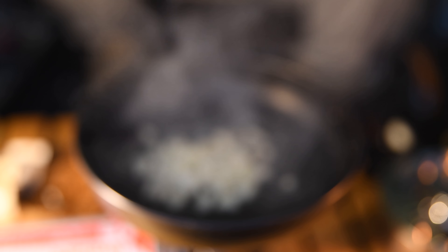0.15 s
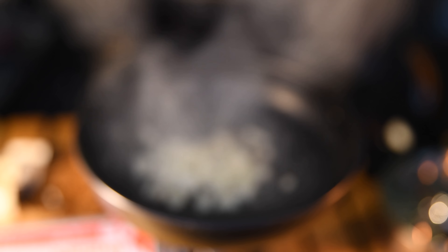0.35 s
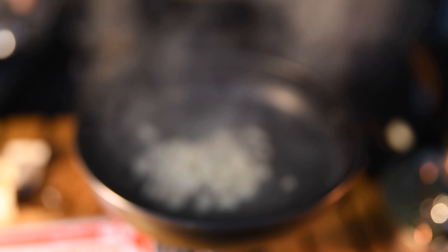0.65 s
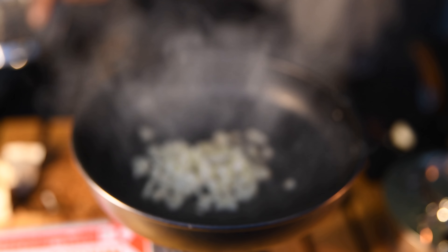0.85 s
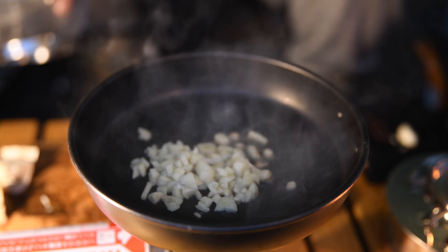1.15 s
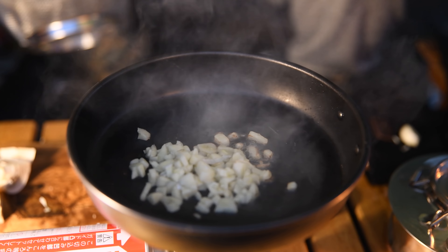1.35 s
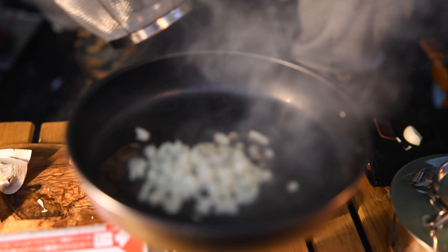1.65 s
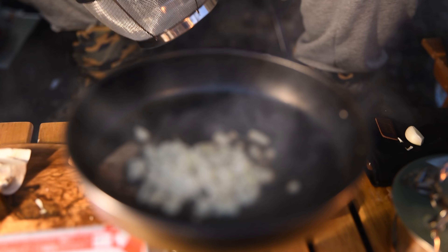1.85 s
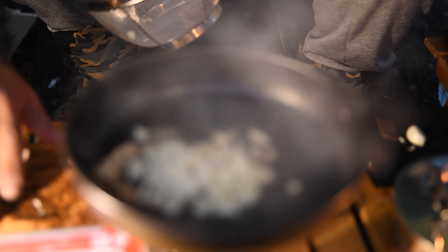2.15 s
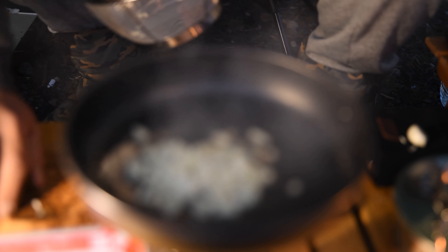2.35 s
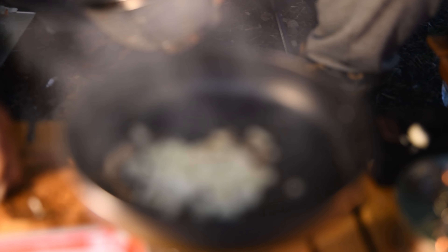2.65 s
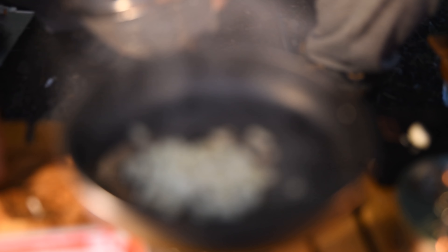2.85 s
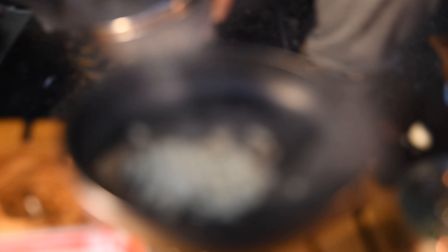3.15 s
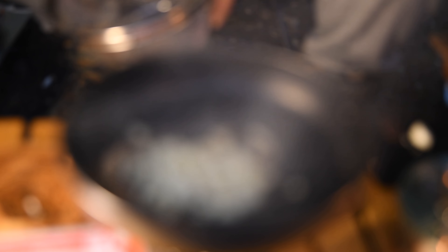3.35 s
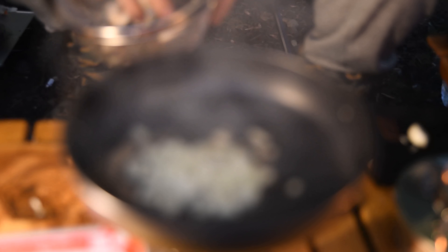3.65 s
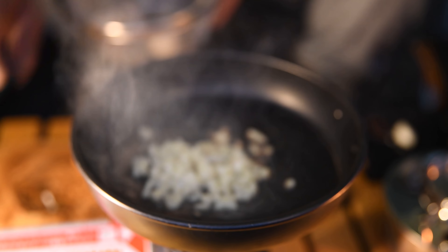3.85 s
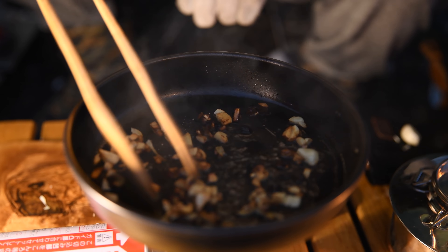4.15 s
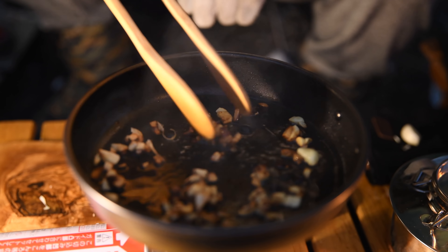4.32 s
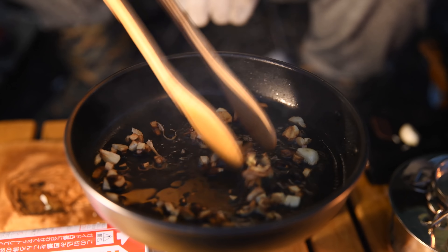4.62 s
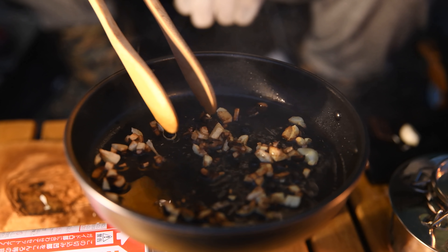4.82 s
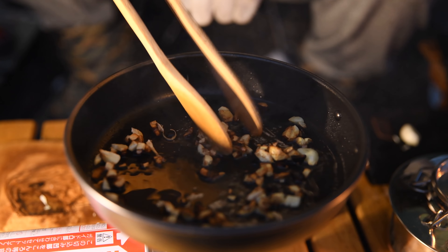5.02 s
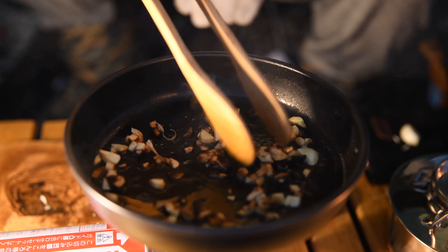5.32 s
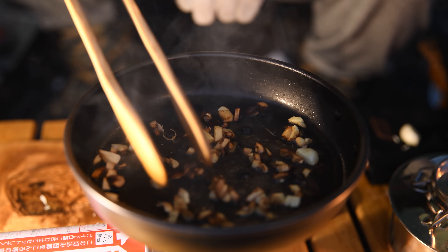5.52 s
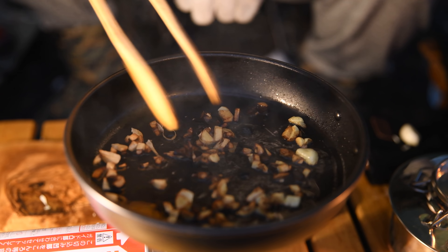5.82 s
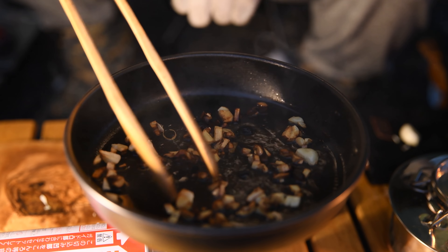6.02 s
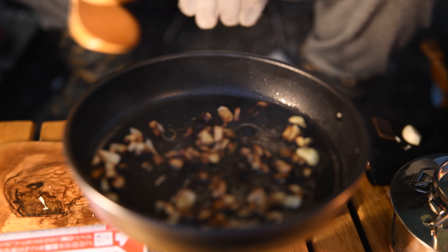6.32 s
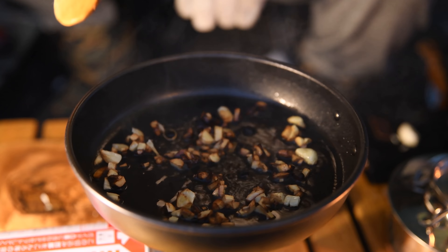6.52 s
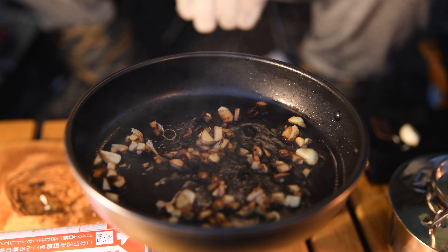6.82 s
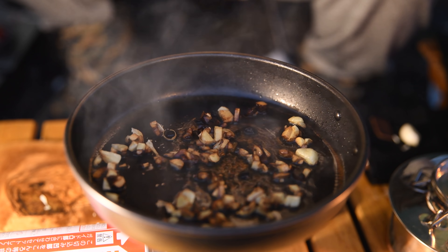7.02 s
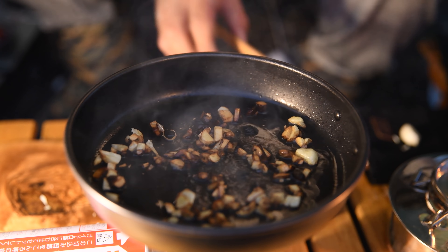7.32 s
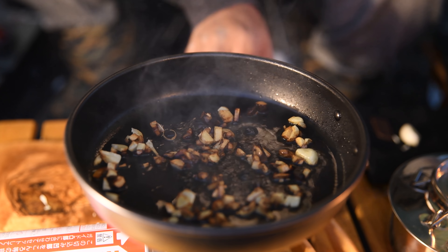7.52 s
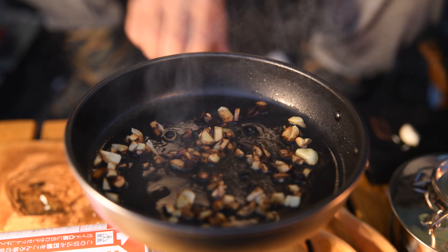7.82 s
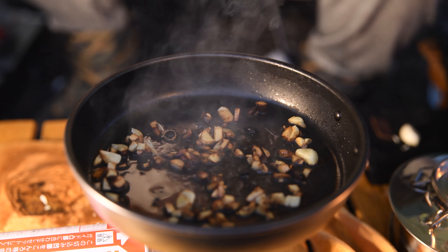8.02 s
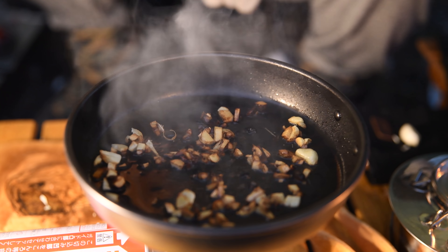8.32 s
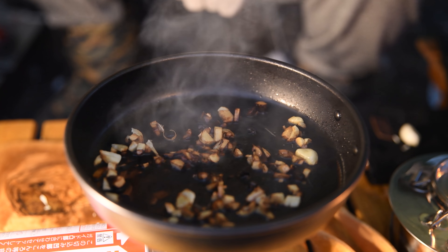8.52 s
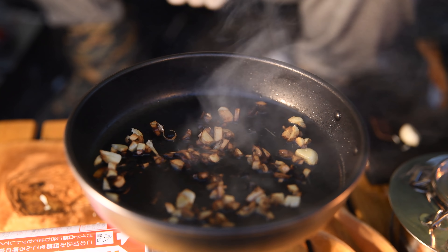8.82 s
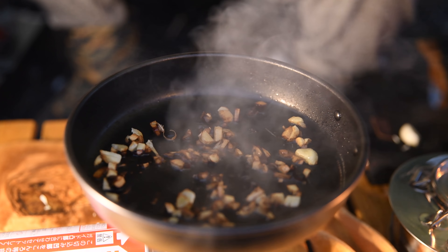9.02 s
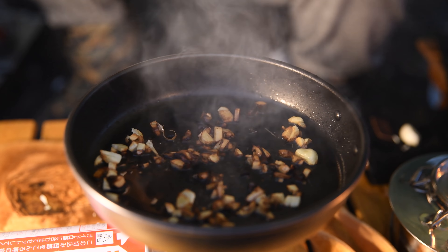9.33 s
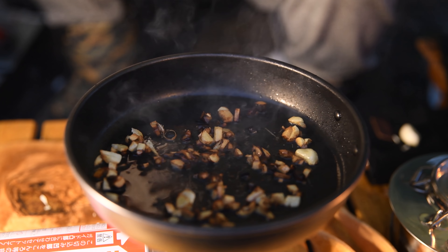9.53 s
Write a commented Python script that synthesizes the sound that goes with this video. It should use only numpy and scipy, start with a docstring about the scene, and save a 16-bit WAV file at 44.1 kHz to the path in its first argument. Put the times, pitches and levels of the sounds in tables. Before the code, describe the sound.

Close outdoor sound of garlic frying in a pan on a gas burner. From 0 to about 4 seconds, the oil sizzles hard: dense dry snaps, rough hiss and short steam spurts, with bigger pops scattered throughout, especially in the first second and near 3 seconds. The treble dulls slightly, over a low flame roar. Wind bumps the microphone softly, most strongly near 3.4. At about 3.96 it cuts abruptly to a far quieter, fine, even simmer over a lower flame, settling within a second. Wooden tongs knock the pan firmly at 4.2, with a small rattle, tiny spurts and faint touches until 5.6; another firm, damped knock comes at 6.1. From 7.6 to 8.0 the tongs clatter and bounce on the slatted wooden table, with a faint last tick near 8.3. The simmer continues, with a low gust around 9.4.

```python
"""Chopped garlic fries in oil in a pan on a gas burner, outdoors and close by, while a breeze rumbles.
First it sizzles hard and spits: random bubble pulses, steam and filtered noise over a roaring flame.
Abruptly, near four seconds, browned garlic simmers: steady hiss and tiny spurts over a lower flame.
Wooden tongs then stir, with two firm knocks and some faint ones on the pan: damped modes and noise.
Last they clatter down on the slatted table: bouncing blows of filtered noise and ringing arms."""
import sys
import numpy as np
from scipy import signal
from scipy.fft import rfft, irfft, next_fast_len
from scipy.io import wavfile

SR = 44100
rng = np.random.default_rng(int(sys.argv[2]) if len(sys.argv) > 2 else 0)


def generate_wav(sig):
    """Save sig (samples, or channels by samples) to the path in sys.argv[1] as 16-bit PCM at SR."""
    pcm = np.round(np.clip(np.atleast_2d(sig).T, -1, 1) * 32767).astype(np.int16)
    wavfile.write(sys.argv[1], SR, pcm)


N = 426447
TIME = np.arange(N) / SR  # seconds
EDGE_HZ = 16000  # upper limit of the sound

# Boiling of the oil. Each row: time in seconds, relative level in dB.
BOIL_LEVEL = [(0, -46), (.9, -46), (1.8, -45.5), (2.6, -45.5), (3.95, -47)]
# Hiss of the hard-frying oil. Each row: frequency in Hz, relative density in dB per Hz.
FRYING_SPECTRUM = [(500, -22), (1000, 9), (1450, 5), (2000, 4.5), (2800, 3.5), (3400, 3.5), (4000, 6.5),
                   (4700, 1), (6300, -18), (8500, -15), (13000, -18), (15800, 0)]
# Roar of the high flame. Each row: frequency in Hz, relative density in dB per Hz.
HIGH_FLAME_SPECTRUM = [(30, -45), (110, -7.5), (200, -4), (290, 0), (420, 1), (520, -1), (600, 0.5),
                       (800, 0.5), (900, -7.5), (1100, -18), (1600, -29), (3000, -93)]
# Gusts on the microphone. Each row: peak in seconds, level in dB, time from peak to 1/e power in seconds.
GUSTS = [(.02, -50, .04), (.82, -52, 0.071), (1.673, -52.5, .06), (1.92, -53, .08), (2.79, -52, .06),
         (3.3, -50.5, .25), (3.444, -39, 0.037), (5.053, -57, .1), (5.8, -64.5, 0.3), (6.76, -59, 0.04),
         (9.35, -47.5, .35), (9.473, -43, 0.027)]
# Rumble of moving air. Each row: frequency in Hz, relative density in dB per Hz.
RUMBLE_SPECTRUM = [(15, -17), (35, -2), (55, 5.5), (85, -1), (130, -5), (250, -36), (600, -60)]
# Single bursting droplets: the large ones of the hard frying, then three faint ones in the simmer.
# Each row: time in seconds, relative energy in dB, pulse centre in Hz (a small bubble is high).
SINGLE_SPITS = [(0.1167, -3, 6600), (0.249, -4.5, 8500), (0.3346, -6.5, 12600), (0.3933, -2, 15000),
                (0.6085, -5, 7300), (0.6262, 3, 2440), (0.6466, -8, 6700), (0.6738, -1, 7950),
                (0.7822, -7.5, 6000), (0.8148, -2, 10400), (0.892, 4, 6630), (1.0134, -6.5, 3700),
                (1.0483, -5.5, 9600), (1.164, -9.5, 2420), (1.341, 1.5, 2550), (1.9414, -5, 6300),
                (2.0346, -6.5, 2300), (2.1296, -3.5, 5700), (2.2552, -9.5, 3600), (2.371, -9, 2370),
                (2.6284, -5.5, 2340), (2.7284, -7.5, 4100), (2.804, -9, 2400), (2.8655, -10.5, 2410),
                (2.9544, 4.5, 3040), (3.1944, -7, 2400), (3.225, -4.5, 2400), (3.5466, -0.5, 2220),
                (3.624, -6.5, 3020), (3.7801, -4, 5950), (3.85, -10, 2400), (4.2896, -21, 3240),
                (4.6185, -18, 5000), (5.204, -20.5, 2400)]
# The pan's short answer to a burst. Each row: frequency in Hz, level in dB, 60 dB decay time in seconds.
BURST_MODES = [(2450, -28, 0.0019), (3020, -26, 0.0083), (4060, -22, 0.01), (4660, -30.5, 0.013),
               (8700, -29, 0.0027)]
# Steam where the tongs press the garlic. Each row: start in seconds, energy in dB,
# centre in Hz, 60 dB decay time in seconds.
PRESSED_SPURTS = [(4.29, -12.5, 3040, 0.017), (4.5583, -17, 4340, 0.01), (5.1205, -22, 7760, .012),
                  (5.526, -18, 4500, 0.13)]
# Hiss of the simmering oil. Each row: frequency in Hz, relative density in dB per Hz.
SIMMER_SPECTRUM = [(590, -43), (1000, -3.5), (1070, -3), (1350, -4.5), (1910, -1.5), (2220, -2.5),
                   (2410, -3), (3520, -4.5), (4000, -0.5), (5460, -12), (7720, -10.5), (11400, -10.5),
                   (14700, -11.5), (15800, -13)]
# Roar of the low flame. Each row: frequency in Hz, relative density in dB per Hz.
LOW_FLAME_SPECTRUM = [(25, -24), (80, -18), (135, -5.5), (180, -9.5), (240, -12), (330, -6.5), (420, 0),
                      (540, -0.5), (650, -10), (800, -15), (1100, -25), (2000, -85)]
# Tongs on the pan. Each row: start in seconds, relative level in dB, hardness as treble limit in Hz,
# pitch factor, place from centre 0 to rim 1.
KNOCKS = [(4.2334, -14, 3050, 1.004, 0.73), (4.325, -35.5, 3000, 1.06, 0.89), (4.359, -40, 2500, 1.1, 1),
          (4.628, -39.5, 900, 1.05, .7), (4.735, -39, 900, 1.01, 0.96), (5.48, -42, 900, 1.05, 0.42),
          (5.632, -36, 900, 1.02, .6), (6.1232, -11.5, 2690, 1, 0)]
# Modes of the pan. Each row: frequency in Hz, level in dB, 60 dB decay time in seconds,
# dB more when struck at the rim.
PAN_MODES = [(258, -12, 0.018, -2.5), (761, -5, 0.057, 3), (790, -6, 0.065, -13), (810, -19, 0.16, -2),
             (925, -22, 0.066, 14), (1170, -24, 0.043, -1), (1400, -10.5, 0.027, -5), (1520, -18, 0.044, 1),
             (1940, -14, 0.04, -2), (2390, -24.5, 0.074, -5), (2680, -26, 0.067, -10), (3070, -25, 0.04, 2),
             (3300, -19, 0.013, 19), (3980, -19, 0.056, -4)]
# Wooden clacks. Each row: start in seconds, relative energy in dB, hardness as treble limit in Hz,
# bass limit in Hz (a firm blow shakes the slats), relative ring of the arms in dB,
# time to the first rebound in seconds, loss per rebound in dB.
CLACKS = [(4.296, -23, 3500, 900, -12, .016, 1), (4.356, -23.5, 2200, 800, -17, 0.0059, 6),
          (7.615, 2, 2500, 690, -30, 0.04, 9.5), (7.7165, 3.5, 6070, 129, -1, 0.043, 14),
          (7.779, -7.5, 3430, 1000, -13, 0.018, 4.5), (7.8456, -0.5, 2380, 200, -27, 0.024, 9),
          (7.9027, -6, 5400, 600, -5.5, 0.013, 6), (7.978, -18, 1600, 800, -21, 0.013, 10),
          (8.279, -19, 2500, 600, -10, 0.0084, 10)]
# Wood of the table. Each row: frequency in Hz, relative density in dB per Hz.
TABLE_SPECTRUM = [(80, -26), (170, -4), (280, 9.5), (450, 1.5), (650, -2), (950, 6.5), (1400, 2),
                  (1750, 6.5), (2300, -1.5), (3800, 2.5), (5000, -6), (9000, -8.5), (15000, -25)]
# Modes of the tongs' arms. Each row: frequency in Hz, mean level in dB, 60 dB decay time in seconds.
ARM_MODES = [(1028, -13, .15), (1720, -4, .09), (2180, -9, .13), (2730, -5, .13), (3941, -6, .04),
             (4660, 0, .09), (5259, -12, .09), (6794, -14, .045)]

TURN_S = 3.958  # the hard frying gives way to the simmer
HOT = round(TURN_S * SR)  # samples of hard frying
DRAUGHT_DB, CALM_DB = -62.5, -74.5  # light draught under the gusts, before and after the turn
PULSE_DELAY = 16  # samples before a burst's pulse
STIR_FROM_S, STIR_TO_S = 3.9, 5.6  # the tongs turn the garlic over
SIMMER_DB, SETTLE_DB, SETTLE_S = -56, 3.5, 0.8  # the simmer starts a little louder and settles
REBOUND, SOFTER = 0.7, 0.6  # factors per rebound on the time gap and on the hardness
SECOND_ARM_S, SECOND_ARM_DB = 0.008, -10  # the other arm lands just after the first


def gain_of(db):
    """Decibel law: twenty decibels make a factor of ten in amplitude."""
    return 10 ** (np.asarray(db) / 20)


def evened(x):
    """Normalization of power: scales to rms 1."""
    return x / np.sqrt(np.mean(x ** 2) + 1e-20)


def unit(x):
    """Normalization of energy: scales to energy 1."""
    return x / np.sqrt(np.sum(x ** 2) + 1e-20)


def level(curve):
    """Amplitude envelope: gain over time, interpolated in dB."""
    return gain_of(np.interp(TIME, *np.transpose(curve)))


def add(mix, start_s, sound):
    """Superposition: pressures add from the given time on."""
    part = mix[max(round(start_s * SR), 0):][:len(sound)]
    part += sound[:len(part)]


def coloured(x, spectrum):
    """Spectral shaping: multiplies each frequency by a gain, interpolated over log frequency."""
    size = next_fast_len(len(x))
    hz, db = np.transpose(spectrum)
    log_hz = np.log(np.fft.rfftfreq(size, 1 / SR) + 1)
    gain = gain_of(np.interp(log_hz, np.log(hz), db))
    return irfft(rfft(x, size) * gain, size)[:len(x)]


def noise(spectrum):
    """Stationary random process: steady coloured noise of rms 1."""
    return evened(coloured(rng.standard_normal(N), spectrum))


def wander(per_s):
    """Slow random fluctuation: random points per second joined by lines, rms 1."""
    return evened(np.interp(TIME * per_s, np.arange(4096), rng.standard_normal(4096)))


def soften(x, hz):
    """Contact compliance: a soft contact takes the treble away."""
    return signal.lfilter(*signal.butter(2, min(hz, 0.45 * SR), fs=SR), x)


def thinned(x, hz):
    """Radiation efficiency: a small body radiates little bass."""
    return signal.sosfilt(signal.butter(3, hz, "high", fs=SR, output="sos"), x)


def ring(modes, t, pitch=1):
    """Modal superposition: dying tones of a struck body, all starting at their crest."""
    total = 0
    for hz, db, t60 in modes:
        total = total + gain_of(db - 60 * t / t60) * np.cos(2 * np.pi * hz * pitch * t)
    return total


def burst(hz, spread=0.062, scatter_db=-12, scatter_t60=0.025, echo_db=-18, echo_t60=0.17,
          damping=2.45, unlike=0.14):
    """Damped bubble pulse: one push and pull of air, then the pan's ring and echoes from wall and table."""
    t = np.arange(1024) / SR
    s = 1j * np.fft.rfftfreq(len(t), 1 / SR)
    in_band = 1 / (1 + (abs(s) / EDGE_HZ) ** 20)
    loss = damping * np.exp(unlike * rng.standard_normal())  # some bubbles snap dry, some ring a little
    bubble = s / (s ** 2 + loss * hz * s + hz ** 2)
    delay = np.exp(-2 * np.pi * s * PULSE_DELAY / SR)
    pulse = unit(irfft(in_band * bubble * delay)[:128])
    scatter, echo = rng.standard_normal((2, len(t)))
    answer = ring(BURST_MODES, t, np.exp(spread * rng.standard_normal()))
    answer += gain_of(scatter_db) * unit(scatter * gain_of(-60 * t / scatter_t60))
    answer += gain_of(echo_db) * unit(echo * gain_of(-60 * t / echo_t60))
    answer[0] += 1  # the direct pulse
    return unit(np.convolve(pulse, answer))


def spurt(hz, t60, width=0.32):
    """Band-passed jet noise: steam escapes through wet oil in a short, pitched hiss."""
    t = np.arange(2048) / SR
    steam = rng.standard_normal(len(t)) * gain_of(-60 * t / t60)
    band = signal.iirpeak(min(hz, EDGE_HZ), 1 / min(width, 1), fs=SR)
    return unit(signal.lfilter(*band, steam))


def crackle(grains, per_s, range_db, size_db, first, last):
    """Random point process: small grains between two samples, the larger the rarer; rms 1 there."""
    chance, size, kind = rng.random((3, N))[:, first:last]
    at = np.flatnonzero(chance < per_s / SR)
    gains = gain_of((-size_db * np.log(size[at])) % range_db)
    kinds = (kind[at] * len(grains)).astype(int)
    out = np.zeros(N + 2048)
    for i, gain, k in zip(at + first, gains, kinds):
        out[i:i + len(grains[k])] += gain * grains[k]
    return out[:N] / np.sqrt(np.mean(out[first:last] ** 2) + 1e-20)


def drying(x, above_hz=6000, fresh_db=2, dull_db_per_s=1.0):
    """Time-varying treble: as the garlic dries, its sizzle dulls."""
    body = signal.sosfiltfilt(signal.butter(2, above_hz, fs=SR, output="sos"), x)
    treble = x - body
    return body + treble * gain_of(fresh_db - dull_db_per_s * TIME)


def hard_frying(crackle_db=0, spurt_db=-8, fizz_db=-3.5, flame_db=-41.5, clump=0.31, flutter_db=3.0):
    """Clustered boiling: wet garlic gives flurries of dry snaps, with spurts, above the roaring flame."""
    flurry = wander(per_s=120)
    snap_grains = [burst(hz) for hz in np.geomspace(4500, 22000, num=40)]
    spurt_grains = [spurt(hz, t60=0.03) for hz in np.geomspace(2400, 13000, num=20)]
    snaps_per_s = 1700 * np.exp(clump * flurry[:HOT])
    pops = crackle(snap_grains, snaps_per_s, range_db=22.5, size_db=4.0, first=0, last=HOT)
    steam = crackle(spurt_grains, per_s=200, range_db=15.5, size_db=4, first=0, last=HOT)
    fizz = noise(FRYING_SPECTRUM) * gain_of(flutter_db * flurry)
    oil = gain_of(crackle_db) * pops + gain_of(spurt_db) * steam + gain_of(fizz_db) * fizz
    flame = gain_of(flame_db) * noise(HIGH_FLAME_SPECTRUM)
    return level(BOIL_LEVEL) * drying(oil) + flame


def breeze(gust_db=3):
    """Turbulent pressure: lumps of air press on the microphone, gusts swelling over a light draught."""
    draught_db = np.where(TIME < TURN_S, DRAUGHT_DB, CALM_DB) + gust_db * wander(per_s=8.3)
    power = gain_of(draught_db) ** 2
    for peak_s, db, half_s in GUSTS:
        power = power + gain_of(db) ** 2 * np.exp(-((TIME - peak_s) / half_s) ** 2)
    return np.sqrt(power) * noise(RUMBLE_SPECTRUM)


def spit(hz, db, steam_db=-10, steam_growth=0.52, steam_t60=0.021):
    """Size scaling: a droplet bursts and lets out steam, relatively more the larger it is."""
    sound = gain_of(steam_db + steam_growth * db) * spurt(hz, steam_t60)
    add(sound, 0, burst(hz))
    return gain_of(db) * sound


def small_spits(top_db=-10, range_db=6, first_hz=9000, last_hz=3000, spread=0.95, count=48):
    """Stratified random timing: small spits pepper the hard frying, bright at first, duller later."""
    out = np.zeros(N)
    for k, (when, size, pitch) in enumerate(rng.random((count, 3))):
        progress = (k + when) / count
        centre_hz = first_hz * (last_hz / first_hz) ** progress
        hz = centre_hz * np.exp(spread * (2 * pitch - 1))
        add(out, progress * TURN_S, spit(hz, top_db - range_db * size, steam_db=-2.5))
    return drying(out)


def spits(trim_db=-1, cluster_s=0.024, smaller_db=-10, ceiling_db=-9.0, spread=0.44, count=2):
    """Event clustering: each listed spit goes off amid a few mostly smaller ones from the same wet spot."""
    out = np.zeros(N)
    for s, db, hz in SINGLE_SPITS:
        add(out, s - PULSE_DELAY / SR, spit(hz, db + trim_db))
        for when, size, pitch in rng.standard_normal((count, 3)):
            small_hz = hz * np.exp(spread * pitch)
            small_db = min(db + smaller_db + size, ceiling_db)
            add(out, s + cluster_s * when, spit(small_hz, small_db))
    return out


def stirring(top_db=-25, range_db=6, low_hz=4500, high_hz=14000, t60=0.0079, snap_db=-4, count=16):
    """Sudden boiling: turned garlic meets hot oil in a few clear spurts and a scatter of tiny ones."""
    out = np.zeros(N)
    for s, db, hz, fade in PRESSED_SPURTS:
        add(out, s, gain_of(db) * spurt(hz, fade))
    for k, (when, size, pitch) in enumerate(rng.random((count, 3))):
        s = STIR_FROM_S + (STIR_TO_S - STIR_FROM_S) * (k + when) / count
        hz = low_hz * (high_hz / low_hz) ** pitch
        db = top_db - range_db * size
        add(out, s, gain_of(db) * spurt(hz, t60))
        add(out, s, gain_of(db + snap_db) * burst(hz))
    return out


def simmer(hiss_db=0, crackle_db=-11, flame_db=-46.5, flutter_db=0.6):
    """Gentle boiling: browned garlic gives only a fine hiss and tiny spurts above the low flame."""
    hiss = noise(SIMMER_SPECTRUM) * gain_of(hiss_db + flutter_db * wander(per_s=41))
    grains = [spurt(hz, t60=0.0051) for hz in np.geomspace(1200, 10000, num=20)]
    ticks = crackle(grains, per_s=440, range_db=16, size_db=4, first=HOT, last=N)
    since_turn_s = np.maximum(TIME - TURN_S, 0)
    settling = gain_of(SIMMER_DB + SETTLE_DB * np.exp(-since_turn_s / SETTLE_S))
    flame = gain_of(flame_db) * noise(LOW_FLAME_SPECTRUM)
    return settling * (hiss + gain_of(crackle_db) * ticks) + flame


def knocks(crack_db=-17, crack_t60=0.049, tail_db=-36, tail_t60=0.56, bass_hz=230):
    """Modal excitation: tongs strike the pan, whose ring is damped by the burner's supports."""
    out = np.zeros(N)
    t = np.arange(SR // 4) / SR
    decay = gain_of(crack_db - 60 * t / crack_t60) + gain_of(tail_db - 60 * t / tail_t60)
    for s, db, hard_hz, pitch, place in KNOCKS:
        crack = rng.standard_normal(len(t)) * decay
        modes = [(hz, mode_db + place * rim_db, t60) for hz, mode_db, t60, rim_db in PAN_MODES]
        add(out, s, gain_of(db) * soften(ring(modes, t, pitch) + crack, hard_hz))
    return thinned(out, bass_hz)


def clatter(thud_t60=0.033, tail_db=-22, tail_t60=0.39, arms_db=-2.5, uneven_db=4.5, count=4):
    """Inelastic rebound: tongs rattle, later drop and bounce on the table; each blow rings them differently."""
    out = np.zeros(N)
    t = np.arange(SR // 6) / SR
    decay = gain_of(-60 * t / thud_t60) + gain_of(tail_db - 60 * t / tail_t60)
    for s, db, hard_hz, low_hz, ring_db, gap_s, loss_db in CLACKS:
        for k in range(count):
            for lag_s, arm_db in (0, 0), (SECOND_ARM_S, SECOND_ARM_DB):
                wood = coloured(rng.standard_normal(len(t)), TABLE_SPECTRUM) * decay
                thud = unit(thinned(soften(wood, hard_hz * SOFTER ** k), low_hz))
                modes = [(hz, mode_db + uneven_db * rng.standard_normal(), t60)
                         for hz, mode_db, t60 in ARM_MODES]
                arms = gain_of(arms_db + ring_db) * unit(ring(modes, t))
                add(out, s + lag_s, gain_of(db + arm_db - k * loss_db) * (thud + arms))
            s += gap_s * REBOUND ** k
    return out


def scene():
    """Superposition of sources: hard frying, then the simmer, with the tongs and the breeze."""
    late = np.clip((TIME - TURN_S) / 0.0047 + 0.5, 0, 1)  # crossfade of 4.7 ms
    frying = (1 - late) * hard_frying() + late * simmer()
    pan = frying + small_spits() + spits() + stirring()
    return (pan + knocks() + clatter() + breeze())[None]


def record(dry):
    """Band limitation: a linear-phase low-pass filter cuts the highest treble."""
    low_pass = signal.firwin(511, EDGE_HZ, window=("kaiser", 9), fs=SR)
    return signal.oaconvolve(dry, low_pass[None], "same")


dry = scene()
out = record(dry)
generate_wav(out)
```